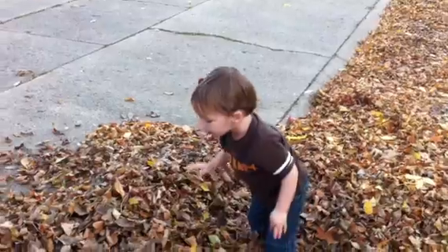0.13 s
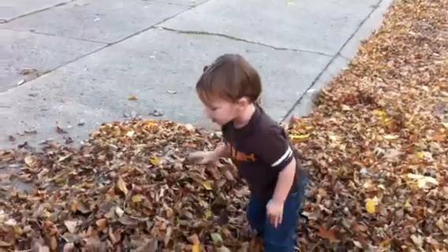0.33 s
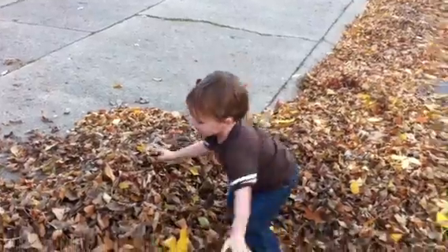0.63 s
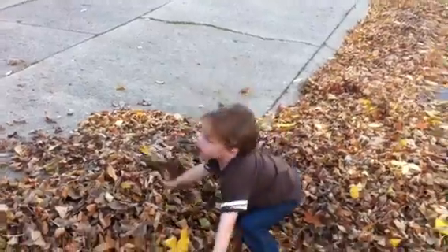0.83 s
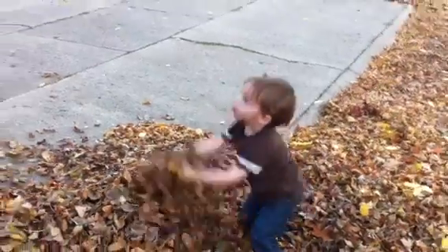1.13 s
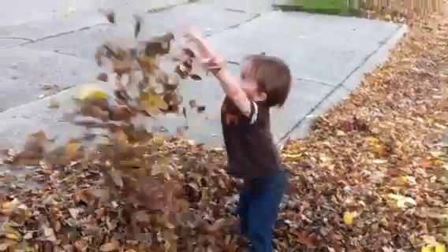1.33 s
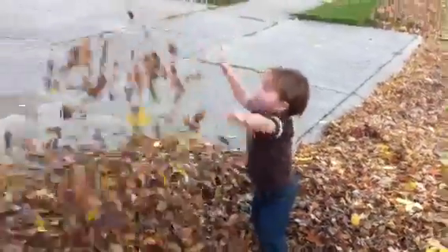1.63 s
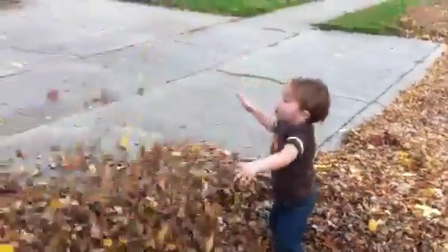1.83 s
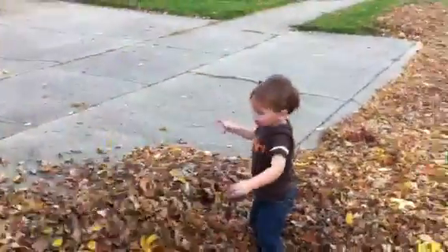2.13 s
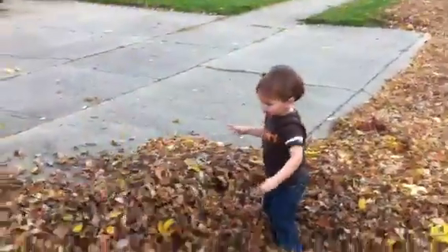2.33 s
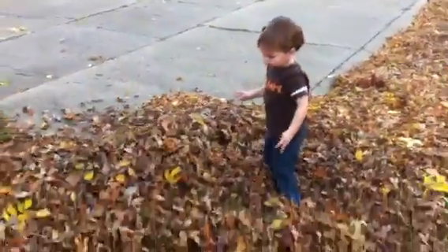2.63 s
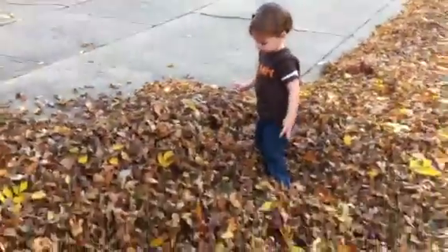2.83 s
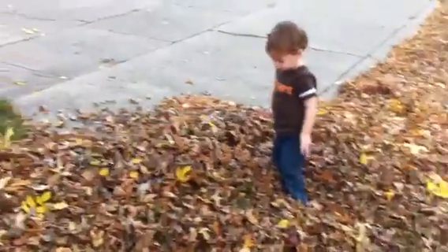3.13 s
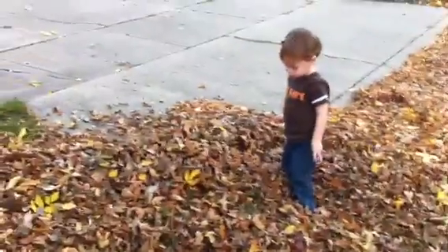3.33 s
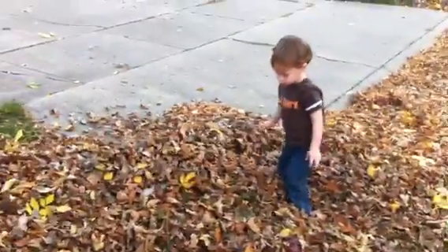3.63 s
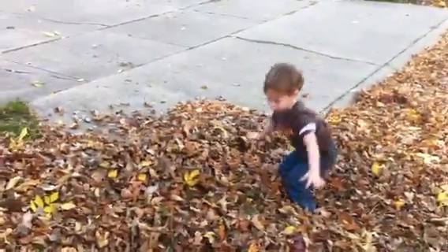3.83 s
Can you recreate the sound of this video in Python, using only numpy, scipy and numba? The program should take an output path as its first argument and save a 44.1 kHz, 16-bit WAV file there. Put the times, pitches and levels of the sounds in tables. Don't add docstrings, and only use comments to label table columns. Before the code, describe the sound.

Dry leaves rustle, crunch and crackle as a child scoops, throws and wades through a pile.

```python
import sys
import numpy as np
from scipy import signal
from scipy.fft import rfft, irfft
from scipy.io import wavfile
from scipy.ndimage import uniform_filter1d
from numba import njit

SR = 44100
rng = np.random.default_rng(int(sys.argv[2]) if len(sys.argv) > 2 else 0)


def to_wav(sig):
    pcm = np.clip(np.atleast_2d(sig), -1, 1) * 32767
    pcm = np.round(pcm).astype(np.int16)
    wavfile.write(sys.argv[1], SR, pcm.T)


def magnitude_from_level(level_db):
    exponent = np.asarray(level_db, float) / 20
    return 10 ** exponent


N = 176400

# [dB, thin leaf edges over leaf bodies]
SHUFFLE = [
    (.085, -59.5, -1),
    (.11, -51.5, 19),
    (.15, -55.5, 2),
    (.2, -60, -2),
    (.3, -64.5, 1),
    (.48, -67.5, -17),
    (.52, -58, -6),
    (.6, -51, -6),
    (.67, -58, 5),
]
BRUSH = [
    (.685, -44.5, -6),
    (.715, -43, 0.5),
    (.75, -51, -1),
    (.86, -51.5, -2),
]
SCOOP = [
    (.89, -48, 3.5),
    (.95, -37, 1),
    (1.02, -30.5, 4),
    (1.13, -32.5, -1.5),
    (1.18, -30, -1),
    (1.26, -31, 2.5),
    (1.329, -37, -4.5),
    (1.37, -42.5, 2),
    (1.44, -41, -1),
]
THROW = [
    (1.481, -41, -3),
    (1.56, -37.5, -4),
    (1.581, -39, 5.5),
    (1.629, -46, 3.5),
    (1.75, -42, 4.5),
    (1.88, -41.5, 3),
]
FALL = [
    (1.94, -37, 6.5),
    (2.0, -42, 9),
    (2.027, -35, 7),
    (2.058, -45, 11),
    (2.14, -41.5, 8),
    (2.22, -44.5, 3),
    (2.32, -48.5, -5.5),
    (2.43, -49, -2),
]
KICK = [
    (2.462, -39, 3),
    (2.498, -30.5, 2.5),
    (2.535, -30, -0.5),
    (2.56, -38, -4),
    (2.61, -43.5, 5),
]
WADE = [
    (2.649, -43, -4),
    (2.68, -39.5, -5),
    (2.76, -36, -0.5),
    (2.799, -38.5, -3),
    (2.834, -34.5, 5.5),
    (2.86, -40.5, -3),
    (2.93, -49.5, 4),
    (3.01, -49.5, -1),
    (3.035, -54.5, -8),
]
PLANT = [
    (3.088, -51.5, 4),
]
STEP = [
    (3.099, -41.5, -4),
    (3.114, -35, -4.5),
    (3.17, -32.5, -7),
    (3.2, -28.5, -7.5),
    (3.27, -33.5, -8.5),
    (3.35, -37.5, -7),
    (3.42, -38.5, -10.5),
    (3.5, -37.5, -7),
    (3.55, -50.5, -6),
]
SETTLE = [
    (3.6, -53, -6),
    (3.7, -55.5, -13),
    (3.85, -54.5, -6),
    (3.92, -63, -15),
    (4, -56.5, -2),
]
# start_s [s], peak_db [dB], pitch_hz [Hz], decay_ms [ms]
SNAPS = [(0.1093, -23, 10000, 2), (0.1923, -22.5, 4400, 0.91), (0.2608, -25.5, 5300, 2.8),
         (0.5062, -18.5, 10300, 0.74), (0.5321, -17, 12000, 0.66), (0.5473, -21, 12000, 1),
         (0.5708, -11, 12400, 0.47), (0.5794, -18, 15000, 1.2), (0.5975, -39, 4690, 1.4),
         (0.6233, -19, 12500, 0.96), (0.7378, -24, 5560, 0.8), (0.8834, -29, 5700, 1.6),
         (1.487, -25, 2700, 1.7), (1.574, -18, 13900, 1.2), (1.759, -19, 6990, 1.4),
         (1.8443, -15, 4570, 1.0), (2.0153, -22, 5290, 1.2), (2.1285, -19, 5200, 4.8),
         (2.2623, -25.5, 2250, 1.5), (2.2862, -28, 3280, 1.5), (2.3465, -25, 5000, 1.5),
         (2.6609, -20.5, 4060, 1.1), (2.726, -14, 5660, 1.2), (2.9496, -20, 3900, 1.45),
         (3.046, -26, 4900, 4.1)]
LATE_SNAPS = [(3.0939, -21, 5230, 3.4), (3.1126, -14, 5400, 1.4), (3.1916, -27, 2040, 1.1),
              (3.2311, -11, 4970, 3.1), (3.2364, -17, 1840, 2.6), (3.3004, -17, 3100, 1.6),
              (3.3568, -13.5, 1470, 1.15), (3.3692, -18, 1840, 0.91), (3.4304, -21, 1780, 1.1),
              (3.4381, -21, 1970, 1.33), (3.4717, -7.5, 10600, 0.78), (3.49, -17.5, 1780, 0.46),
              (3.4974, -26, 5440, 1.2), (3.5506, -27, 1680, 1.8), (3.5833, -38, 2050, 1.2),
              (3.6112, -40, 5180, 1.2), (3.6486, -28.5, 5050, 1.8), (3.7315, -13, 10100, 1),
              (3.7434, -45, 4880, 1), (3.768, -24.5, 4970, 2.8), (3.7953, -24, 1730, 0.54),
              (3.8157, -34, 5120, 1.1), (3.851, -39, 1880, 1.3), (3.8644, -38, 1980, 0.98),
              (3.8836, -35, 4650, 1.2)]
# start_s [s], peak_db [dB], pitch_hz [Hz], decay_ms [ms]
MORE_SNAPS = [(0.505, -30.5, 1810, 1.1), (0.7385, -24, 14000, .7), (0.9447, -26, 5320, 1.5),
              (1.0135, -17, 9800, 1.6), (1.0235, -12, 9500, 2), (1.05, -18, 6000, 1.5),
              (1.064, -14, 6100, 1.4), (1.0905, -13, 9600, 1), (1.195, -14, 5500, 1.2),
              (1.212, -16, 5600, 2.3), (1.227, -22.5, 2200, 2.7), (1.319, -24, 1500, 1),
              (1.334, -19, 5800, 1.4), (1.6604, -23, 9000, 1.2), (1.8435, -17, 2300, 1.35),
              (2.4811, -18, 6090, 1.5), (2.4961, -12, 5550, 1.4), (2.508, -12, 13000, 1.7),
              (2.52, -13.5, 5400, 2.5), (2.744, -20, 2280, 1.3), (2.811, -24.5, 1490, 1.5),
              (2.833, -21, 12000, 1.5), (2.9875, -30, 2420, 1.7), (2.9955, -28, 12000, 1),
              (3.137, -19, 5300, 1.8), (3.1915, -6, 10500, 1.4), (3.2914, -20, 2030, 1.3),
              (3.321, -11, 12000, 1.2), (3.5465, -27.5, 6000, 1.5), (3.5835, -24.5, 11500, 1.5),
              (3.661, -24.5, 5000, 1), (3.6875, -38.5, 1760, 1.3), (3.7955, -27, 5830, 0.84),
              (3.866, -29, 11000, 1), (3.8845, -27.5, 12500, 1.3), (3.9, -36, 13500, 1)]
# pitch_hz [Hz], level_db [dB]
LEAF_SPECTRUM = [(400, -43), (800, -15.5), (1500, -10.5), (2500, -3.5), (4000, 0.5), (6000, 1.5),
                 (10000, 0), (16000, 4.5)]
# start_s [s], open_view_db [dB, top octave],
# reflection_share [0-1, of the close reflection]
PLACE = [(.1, 1.5, 0.76), (.5, 0, 0.63), (.7, 4, 1), (.9, -1, 0.9), (1.04, -0.5, 0.9), (1.15, -1, 0.57),
         (1.33, 0, 1), (1.5, -1, 1), (1.7, 1, 0.94), (2.05, -2.5, 0.94), (2.3, -2, .9), (2.5, -6.5, 0.9),
         (2.7, -3.5, 1.), (2.84, -4, 0.88), (3.1, 1.5, 0.97), (3.3, 7, 1), (3.5, 2, 0.98), (3.9, -4, .8)]
# start_s [s], length_s [s], level_db [dB]
CHIRPS = [
    (0.1, .19, -61),
    (0.3, .1, -66),
    (0.645, 0.2, -58),
    (2.335, 0.16, -62),
    (2.96, .07, -61),
    (3.903, .09, -57),
]
# pitch_hz [Hz], density_db [dB per Hz]
TOWN_SPECTRUM = [(30, -45), (93, -11), (210, -1), (430, -16.5), (1000, -21.5), (3300, -37.5), (5500, -30.5),
                 (16000, -38)]

CRACKS_PER_S, CYCLES, EDGE_HZ, VIEW_HZ = 14000, 1.67, 3700, 7500
BUSY_DB, DENSITY_LAW, LEAST_SHARE = -35.5, 0.35, 0.13
SCATTER_DB, CLUMP_DB, SWISH_DB, LEAF_DB = 2.5, 1.5, -5, -0.23
CRUNCH_LAW, SWISH_LAW = 0.21, 0.092
SNAP_WIDE_DB, SNAP_Q, SNAP_GAIN_DB, SPIKE, WIDE_FADE_HZ = -5, 1.35, -4.5, 0.9, 7000
CRICKET_HZ, CRICKET_WIDTH_HZ, PULSE_S, CHIRP_WANDER_DB = 4650, 170, 0.0497, 1.5
TOWN_DB, TOWN_WANDER_DB = -50.5, 0.7
DRONE_HZ, DRONE_DB, DRONE_NEAR_S, DRONE_SWELL_DB, DRONE_SWELL_S = 141.7, -15, 3.1, 11.5, 0.93
YARD_DB, YARD_T60_S, LOW_CUT_HZ = -12, 0.039, 258
COMB_HZ, COMB_GAIN, COMB_FADE_HZ = 3752, 0.59, 10600
START_S, TOP_HZ = 0.0835, 15720


def unit(x):
    return x / np.sqrt(np.mean(x ** 2))


def curve(points, hz):
    p = np.array(points, float)
    return np.interp(np.log(hz), np.log(p[:, 0]), p[:, 1])


def band(x, hz, width):
    centre = min(hz, 0.4 * SR)
    q = max(hz / width, 0.3)
    return signal.lfilter(*signal.iirpeak(centre, q, fs=SR), x)


def walk(rate):
    k = int(SR / rate)
    held = np.repeat(rng.standard_normal(2000), k)[:N]
    return 1.3 * uniform_filter1d(uniform_filter1d(held, k), k)


@njit
def grains(at, hz, cycles, size, phase):
    out = np.zeros(N)
    for k in range(len(at)):
        if size[k] > 0:
            turn = np.exp((2j * np.pi - 1 / cycles[k]) * hz[k] / SR)
            z = size[k] * np.exp(1j * phase[k])
            for i in range(at[k], min(N, at[k] + int(6 * cycles[k] * SR / hz[k]))):
                out[i] += z.imag
                z *= turn
    return out


def edge_lean(hz):
    return np.tanh(2 * np.log(hz / EDGE_HZ)) / 2


def top_octave(hz):
    return 1 / (1 + (VIEW_HZ / hz) ** 6)


def leaf_cracks(effort, crisp, view):
    share = np.clip(magnitude_from_level(2 * DENSITY_LAW * (effort - BUSY_DB)), LEAST_SHARE, 1)
    u = rng.random((4 * CRACKS_PER_S, 6)).T
    at = (u[0] * N).astype(np.int64)
    hz = 400 * 40 ** u[1]
    cycles = CYCLES * (0.5 + 2 * u[2]) * (hz / EDGE_HZ) ** 0.26
    db = effort[at] + edge_lean(hz) * crisp[at] + view[at] * top_octave(hz) + curve(LEAF_SPECTRUM, hz)
    scatter = np.clip(SCATTER_DB - CRUNCH_LAW * crisp[at], 1, 4)
    db = db - scatter * (np.log(u[3] + 0.012) + 1)
    energy = np.sqrt(4 * hz / cycles / CRACKS_PER_S / share[at])
    sounding = u[4] < share[at]
    return grains(at, hz, cycles, magnitude_from_level(db) * energy * sounding, 2 * np.pi * u[5])


def leaf_swish(effort, crisp, view):
    swish = 0
    for hz in 500 * 2 ** np.arange(0, 5.1, 0.5):
        db = curve(LEAF_SPECTRUM, hz) + edge_lean(hz) * crisp + view * top_octave(hz) + 2.7 * walk(22)
        swish = swish + magnitude_from_level(db) * unit(band(rng.standard_normal(N), hz, hz / 2.9))
    weak = SWISH_LAW * np.minimum(effort - BUSY_DB, 0)
    return magnitude_from_level(effort + SWISH_DB - 7.5 + weak) * swish


def leaves():
    rows = np.vstack([SHUFFLE, BRUSH, SCOOP, THROW, FALL, KICK, WADE, PLANT, STEP, SETTLE])
    t = np.arange(N) / SR
    effort = np.interp(t, rows[:, 0], rows[:, 1])
    crisp = np.interp(t, rows[:, 0], rows[:, 2])
    effort = effort + LEAF_DB + CLUMP_DB * (0.25 * walk(30) + 0.55 * walk(150))
    view = np.interp(t, *np.array(PLACE).T[:2])
    return leaf_cracks(effort, crisp, view) + leaf_swish(effort, crisp, view)


def snaps():
    size = 2048
    out, t = np.zeros(N + size), np.arange(size) / SR
    for start_s, peak_db, hz, ms in list(SNAPS) + list(LATE_SNAPS) + list(MORE_SNAPS):
        tau = np.clip(ms, 0.3, 8) / 1000
        envelope = np.exp(-t / tau) * (1 - np.exp(-t / tau / 0.24))
        ring, wide = rng.standard_normal((2, size)) * envelope
        ring = band(band(ring, hz, hz / SNAP_Q), hz, hz / SNAP_Q)
        wide = band(wide, 0.49 * hz, 1.23 * hz)
        burst = unit(ring) + magnitude_from_level(SNAP_WIDE_DB) * unit(wide) / (1 + (hz / WIDE_FADE_HZ) ** 2)
        sharpness = SPIKE * min(hz / WIDE_FADE_HZ, 1)
        burst[:3] += sharpness * np.abs(burst).max() * np.array([-1, 2, -1])
        i = int(start_s * SR)
        out[i:i + size] += magnitude_from_level(peak_db + SNAP_GAIN_DB) * burst / np.abs(burst).max()
    return out[:N]


def cricket():
    t, gate = np.arange(N) / SR, 0
    for start_s, length_s, db in CHIRPS:
        chirping = (t > start_s) * (t < start_s + length_s)
        level = magnitude_from_level(db + CHIRP_WANDER_DB * walk(12))
        throb = 0.091 + 2.4 * np.sin(np.pi * (t - start_s) / PULSE_S + 0.2) ** 2
        gate = gate + chirping * level * np.clip(throb, 0, 1)
    tone = band(rng.standard_normal(N), CRICKET_HZ, CRICKET_WIDTH_HZ)
    tone = band(tone, CRICKET_HZ, 2 * CRICKET_WIDTH_HZ)
    return unit(tone) * gate


def town():
    f, t = np.maximum(np.fft.rfftfreq(N, 1 / SR), 1), np.arange(N) / SR
    hum = unit(irfft(rfft(rng.standard_normal(N)) * magnitude_from_level(curve(TOWN_SPECTRUM, f)), N))
    swell = DRONE_DB + DRONE_SWELL_DB * np.exp(-((t - DRONE_NEAR_S) / DRONE_SWELL_S) ** 2)
    drone = unit(band(rng.standard_normal(N), DRONE_HZ, 11.0)) * magnitude_from_level(swell)
    strand = unit(band(rng.standard_normal(N), 218.0, 41.0)) * magnitude_from_level(-12.5 + 2.0 * walk(3.8))
    return magnitude_from_level(TOWN_DB + TOWN_WANDER_DB * walk(8.4)) * (hum + drone + strand)


def yard(dry):
    t = np.arange(4096) / SR
    tail = rng.standard_normal(4096) * np.exp(-np.log(1000) * t / YARD_T60_S)
    tail = tail / np.sqrt(np.sum(tail ** 2))
    return dry + magnitude_from_level(YARD_DB) * signal.fftconvolve(dry, tail)[:N]


def close_reflection(mix):
    f = np.fft.rfftfreq(N, 1 / SR)
    delay = np.exp(-(f / COMB_FADE_HZ) ** 4 - 2j * np.pi * f / COMB_HZ)
    echo = COMB_GAIN * delay * np.tanh(f / LOW_CUT_HZ)
    place = np.array(PLACE).T
    share = np.interp(np.arange(N) / SR, place[0], place[2])
    share = np.clip(share + 0.14 * walk(12), 0, 1.4)
    return mix - share * irfft(rfft(mix) * echo, N)


def scene():
    low_cut = signal.butter(3, LOW_CUT_HZ, "high", fs=SR, output="sos")
    pile = signal.sosfilt(low_cut, leaves() + snaps())
    mix = yard(pile) + town()
    return (close_reflection(mix) + cricket())[None]


def roll_off(x):
    return signal.sosfilt(signal.butter(12, 16990, fs=SR, output="sos"), x)


def record(dry):
    top_cut = signal.ellip(12, 0.5, 56, TOP_HZ, fs=SR, output="sos")
    x = signal.sosfilt(top_cut, dry)
    started = np.arange(N) > START_S * SR
    return roll_off(x * started)


dry = scene()
out = record(dry)
to_wav(out)
```